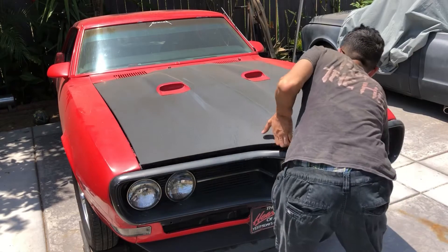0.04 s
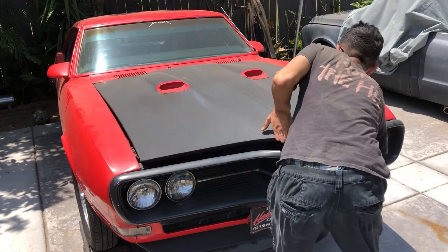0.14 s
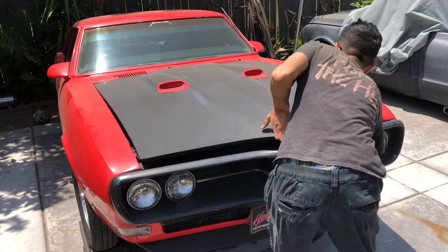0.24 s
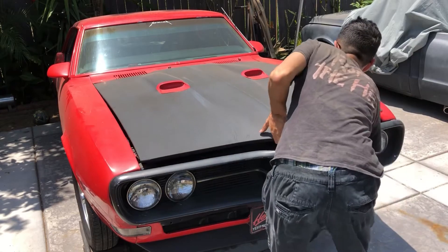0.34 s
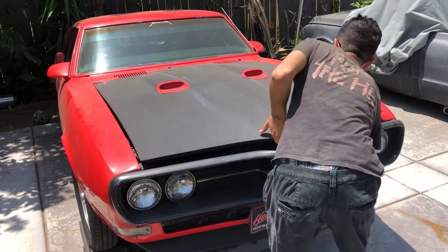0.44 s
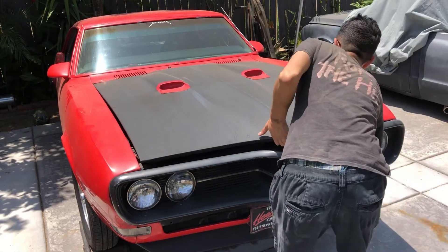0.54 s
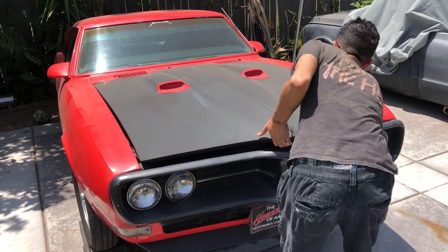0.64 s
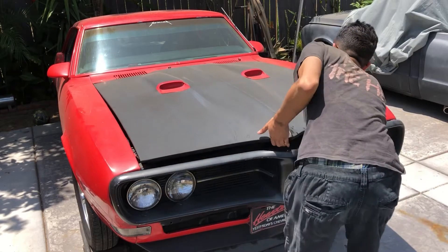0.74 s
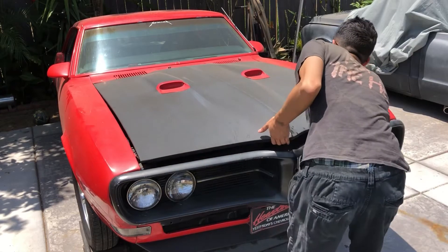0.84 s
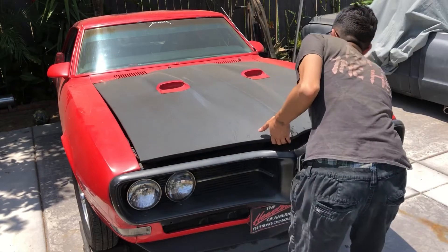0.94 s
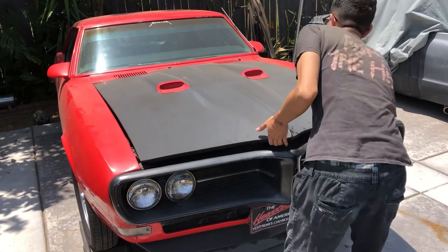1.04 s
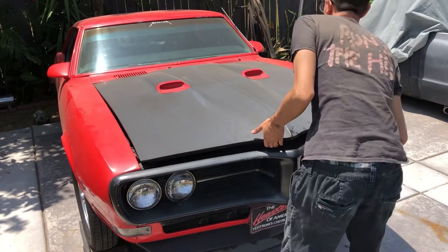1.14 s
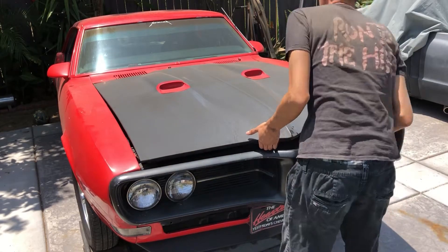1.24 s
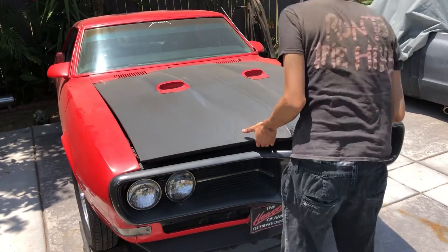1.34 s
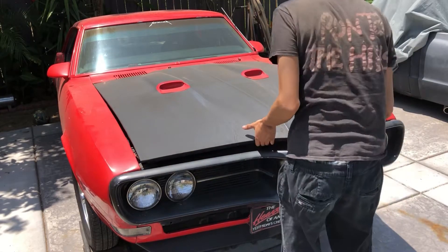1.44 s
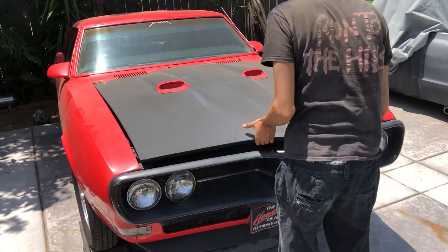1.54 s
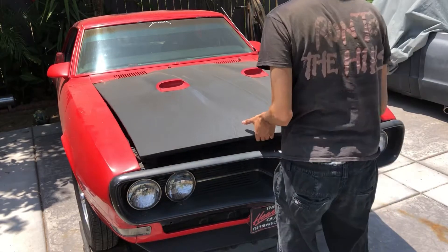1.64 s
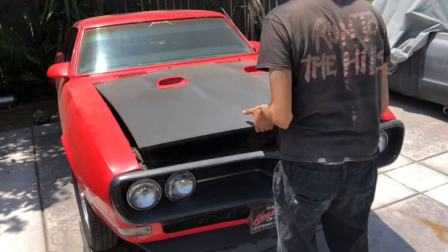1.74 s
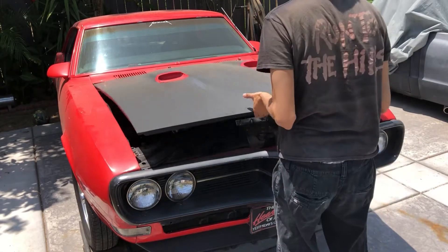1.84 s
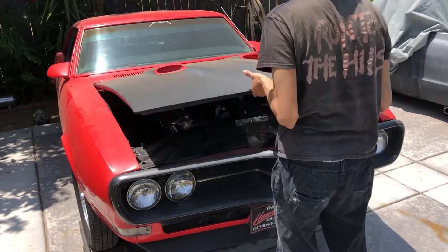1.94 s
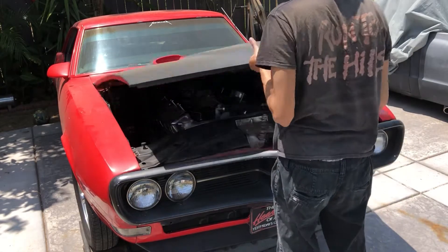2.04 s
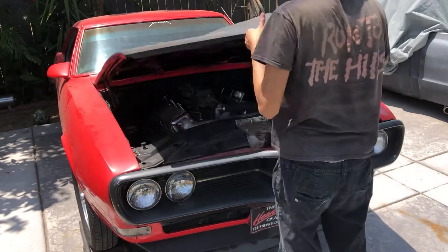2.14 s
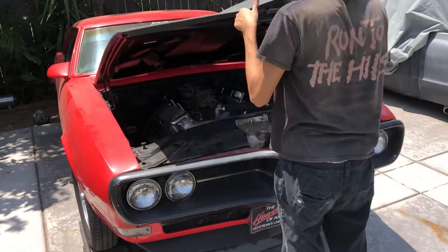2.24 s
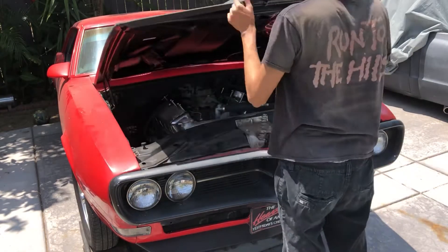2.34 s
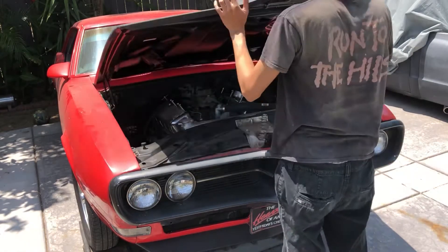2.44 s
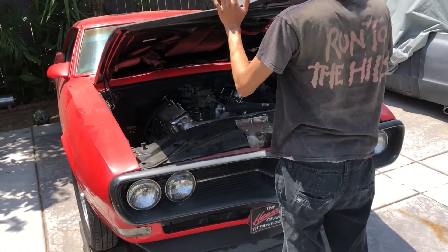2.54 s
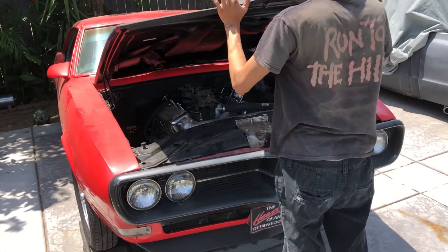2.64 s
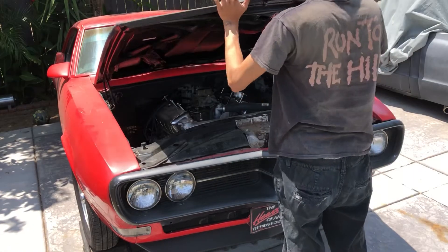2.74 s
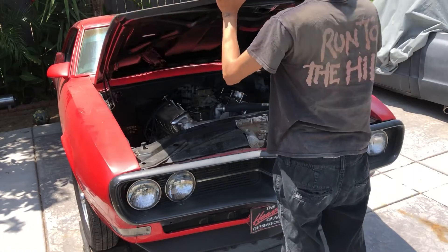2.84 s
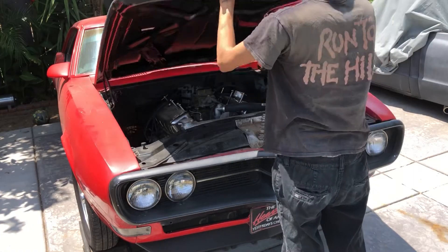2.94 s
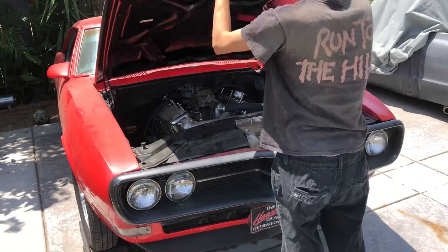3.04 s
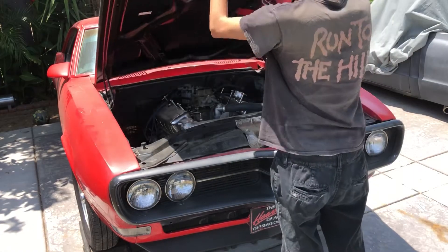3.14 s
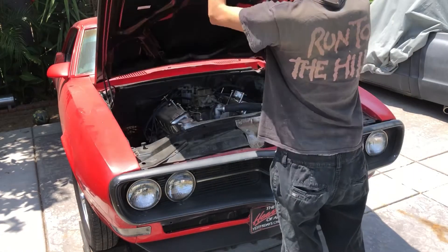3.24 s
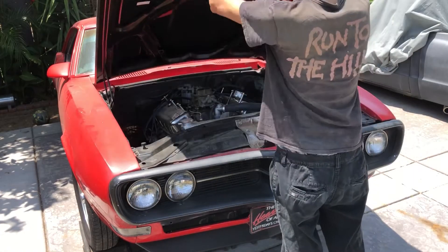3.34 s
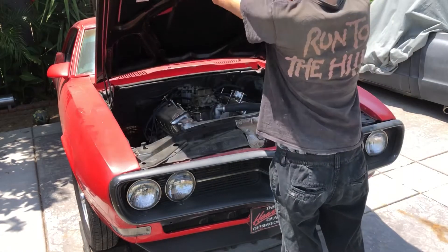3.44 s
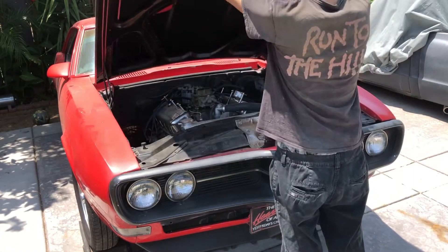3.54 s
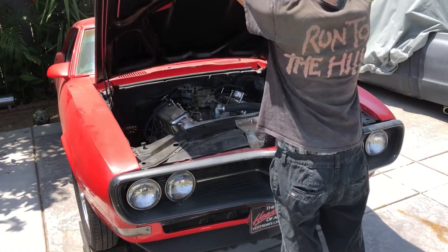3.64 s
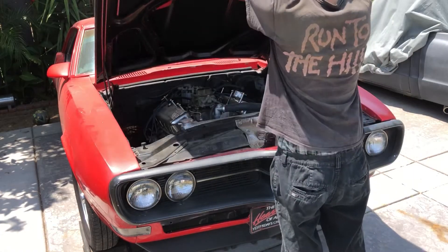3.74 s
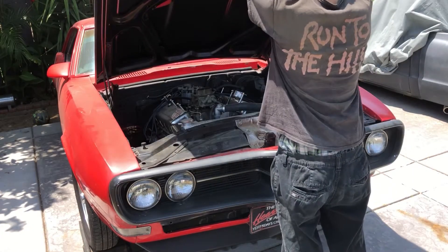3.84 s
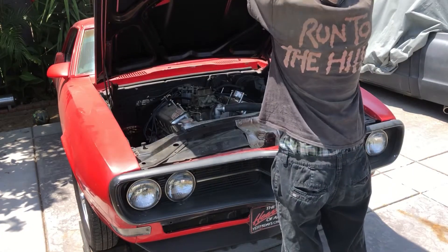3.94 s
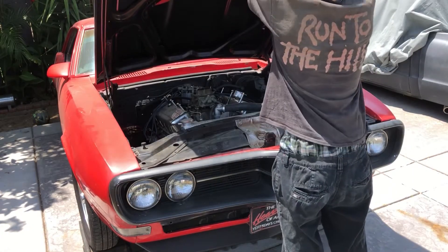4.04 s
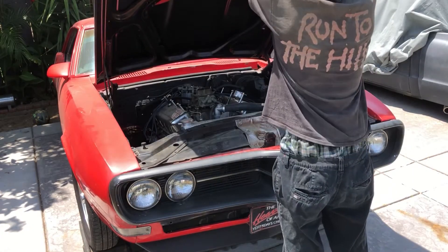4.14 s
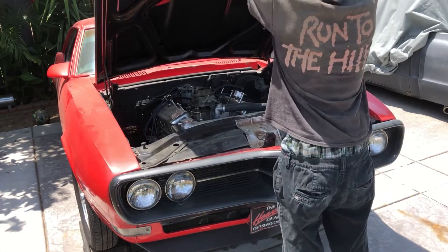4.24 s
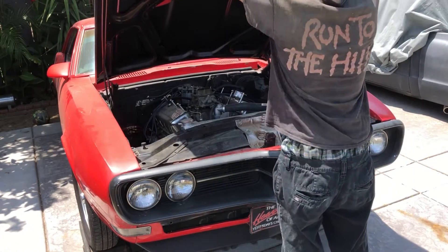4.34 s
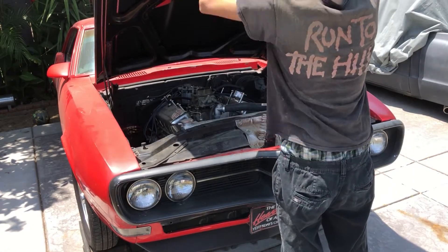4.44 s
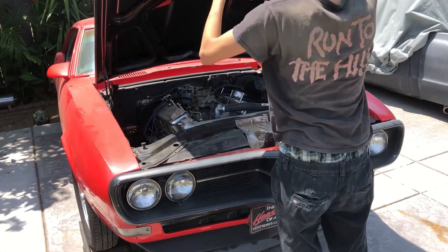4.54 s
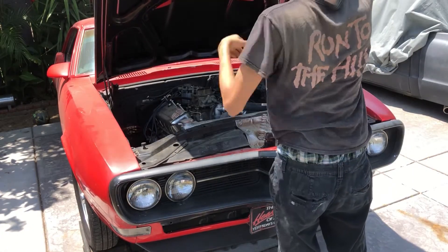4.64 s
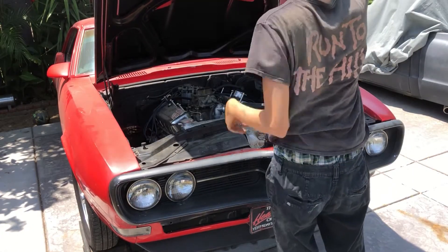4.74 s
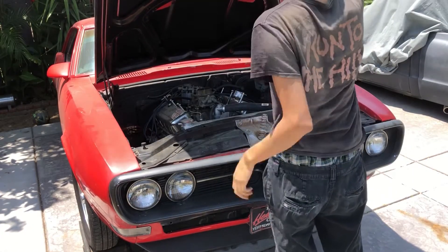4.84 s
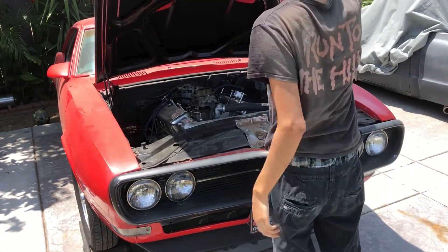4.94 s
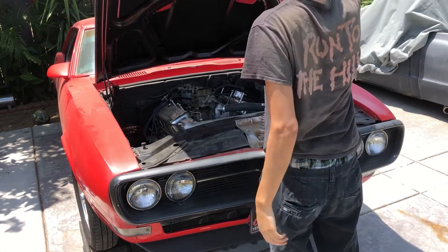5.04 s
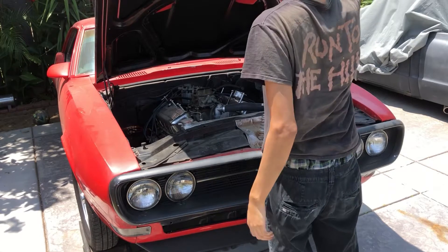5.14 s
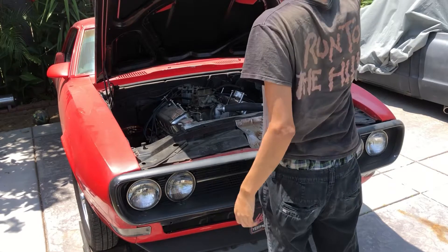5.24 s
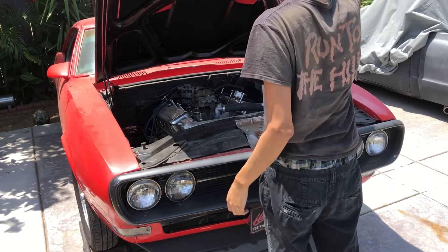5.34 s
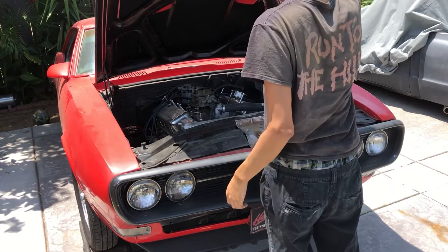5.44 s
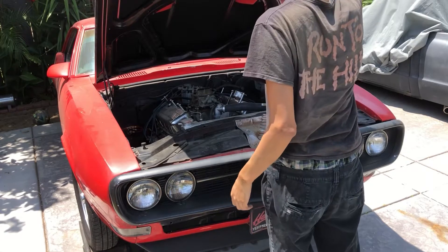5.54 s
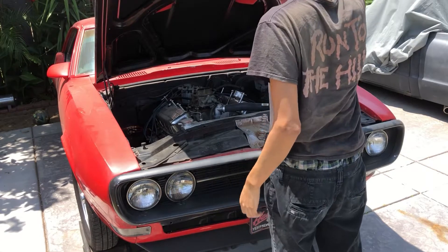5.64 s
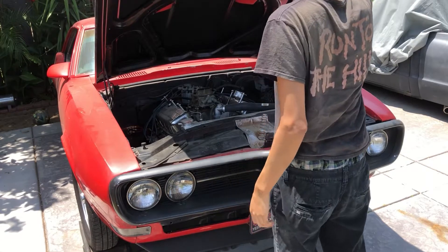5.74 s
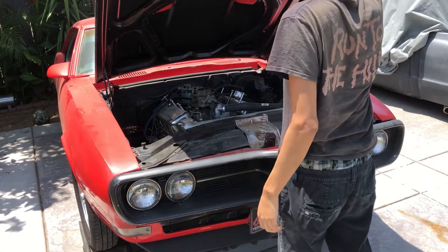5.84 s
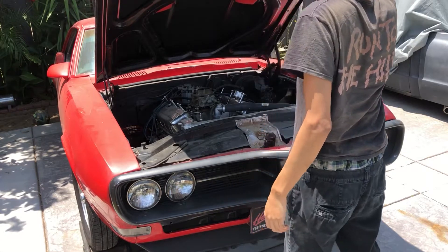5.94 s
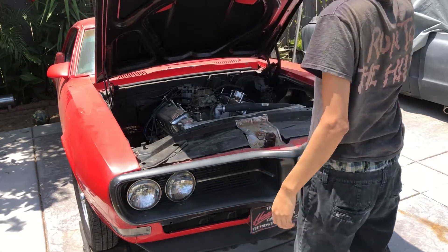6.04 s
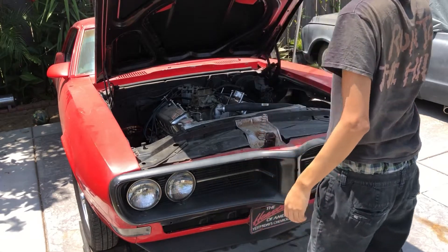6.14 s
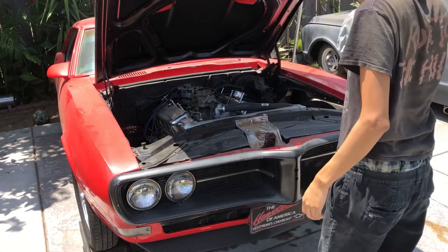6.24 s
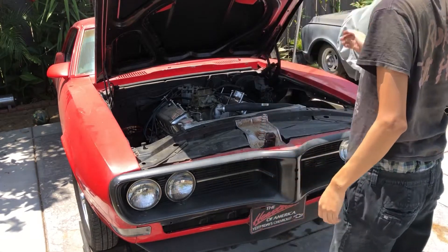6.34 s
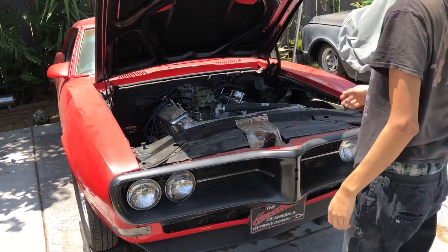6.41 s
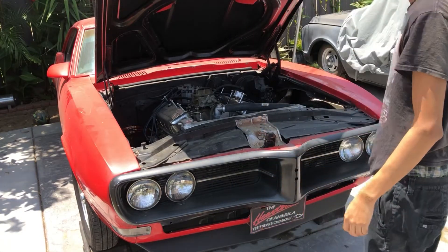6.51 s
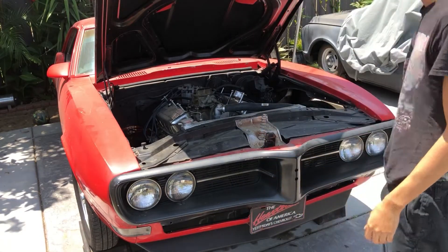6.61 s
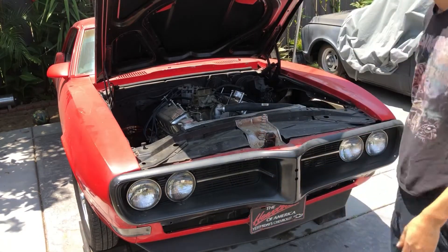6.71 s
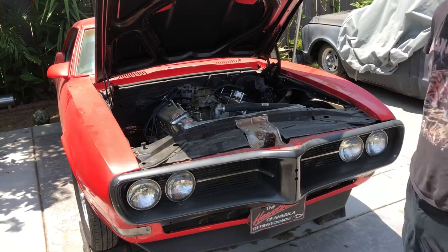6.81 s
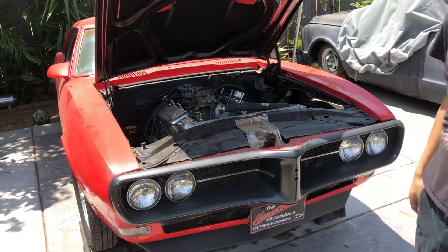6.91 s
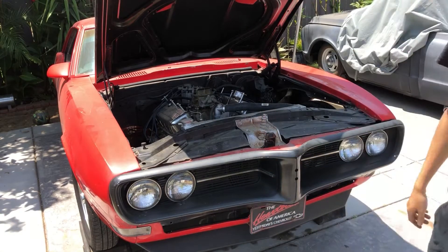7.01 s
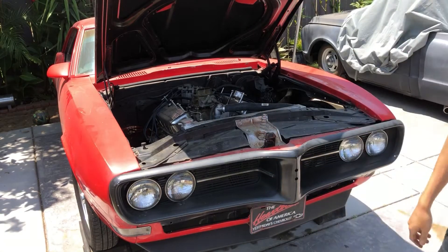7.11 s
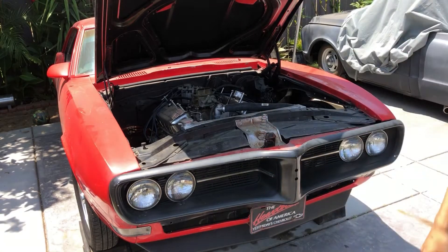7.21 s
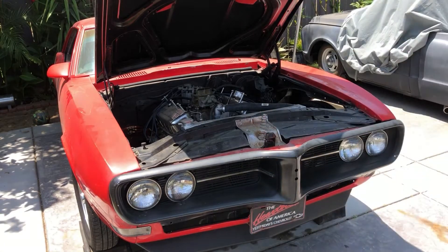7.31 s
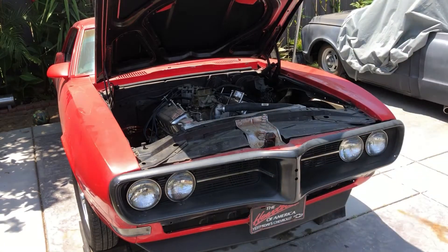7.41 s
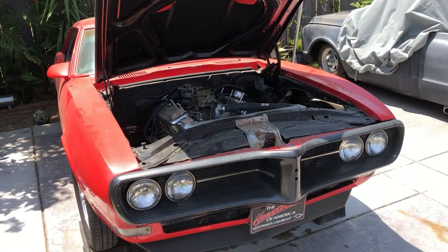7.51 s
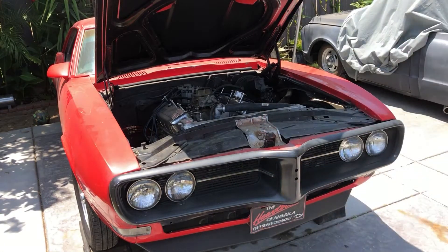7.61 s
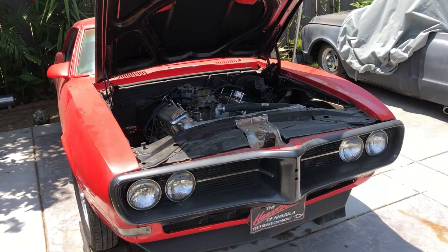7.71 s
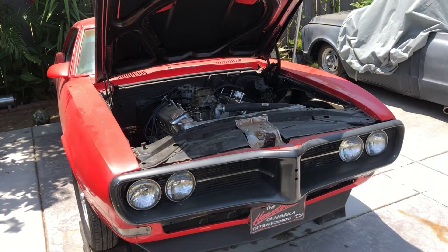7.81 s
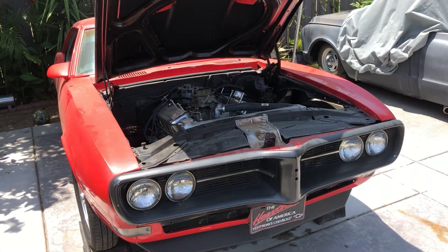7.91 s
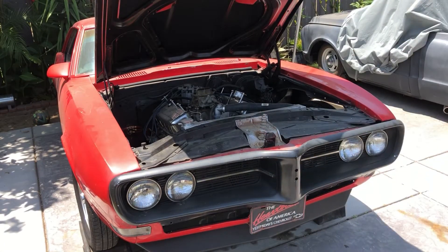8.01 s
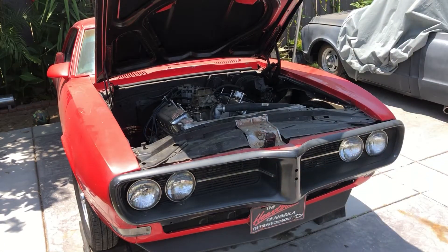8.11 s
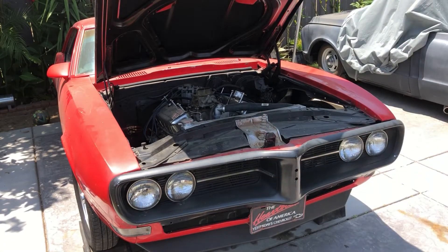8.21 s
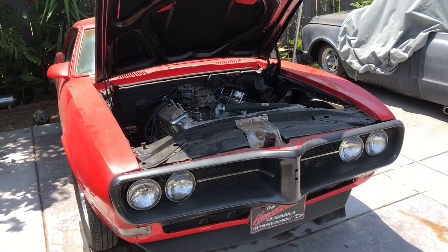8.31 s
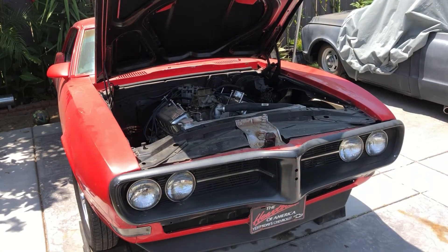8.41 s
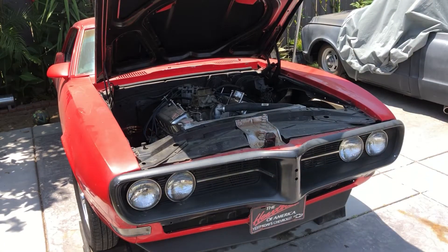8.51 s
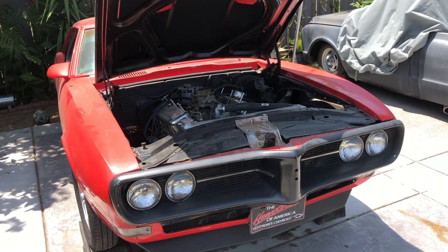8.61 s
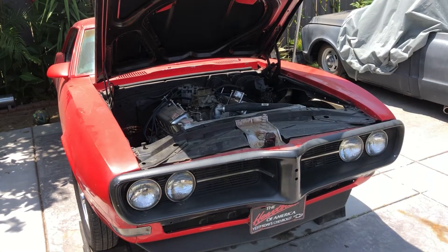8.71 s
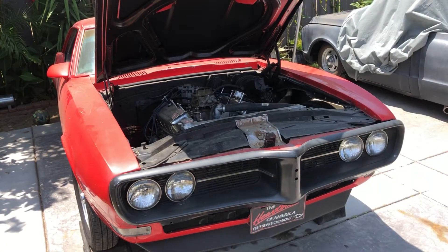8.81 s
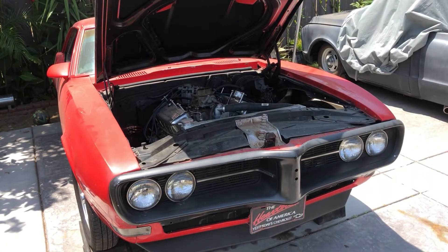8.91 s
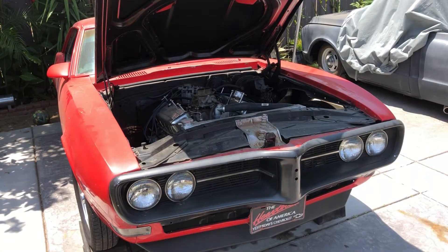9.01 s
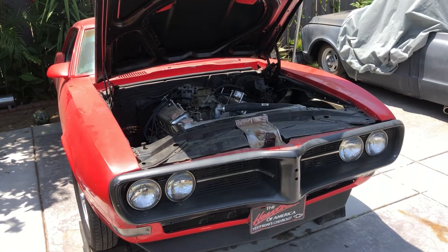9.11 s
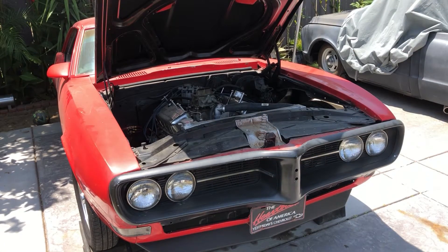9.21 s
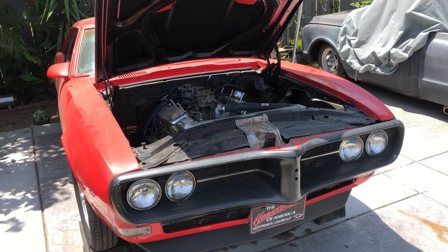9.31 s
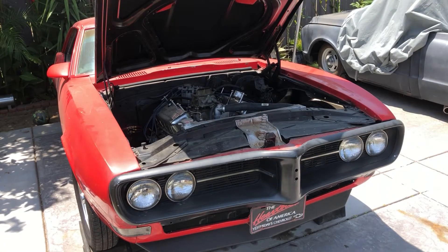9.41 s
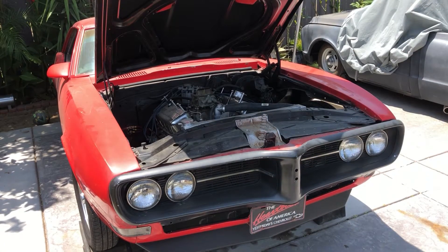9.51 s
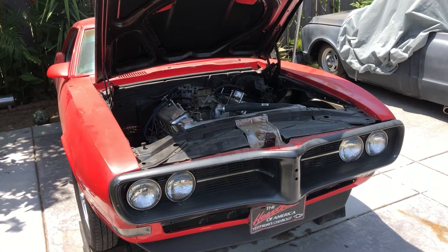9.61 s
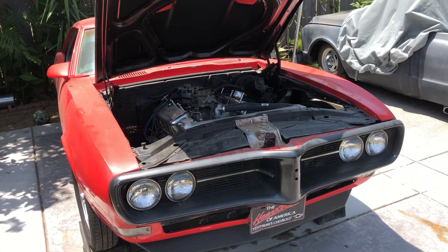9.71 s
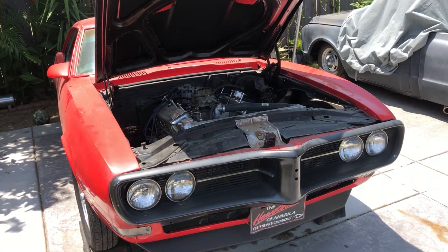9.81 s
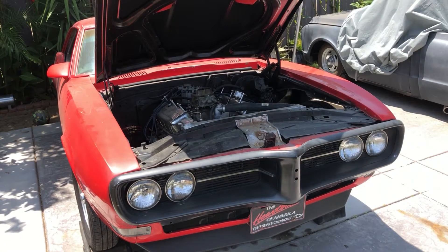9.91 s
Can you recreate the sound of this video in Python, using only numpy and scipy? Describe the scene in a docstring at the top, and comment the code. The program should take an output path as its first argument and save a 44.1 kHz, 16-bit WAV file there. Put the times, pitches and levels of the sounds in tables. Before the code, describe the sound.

Close by, a car's steel hood pops loose with a sharp, ringing clunk and lighter clicks. The catch then scrapes and snaps open, and a spring rattles quickly against the hinge as the hood lifts. The rest is quiet outdoor air: one nearby bird whistles falling notes, others chirp farther off, shoes scuff softly on paving, and a far engine drones under the hush of a town.

```python
"""A car's hood latch lets go with clunks in a paved yard: steel rasps on steel and rings the plate and hood.
The safety catch snaps free and the hood swings up, flexing, while a hinge spring chatters against its arm.
A near bird whistles mostly falling notes, farther birds twitter and chip, shoes scuff the paving,
and a far engine drones over the hush of the town."""
import sys
import numpy as np
from scipy import signal
from scipy.fft import rfft, irfft, next_fast_len
from scipy.io import wavfile
from scipy.ndimage import map_coordinates

SR = 44100
rng = np.random.default_rng(int(sys.argv[2]) if len(sys.argv) > 2 else 0)


def generate_wav(signal):
    """Clip the signal to [-1, 1] and save it as 16-bit WAV at the path in sys.argv[1]."""
    frames = np.transpose(np.atleast_2d(signal))
    scaled = np.clip(frames, -1, 1) * 32767
    pcm = np.round(scaled).astype(np.int16)
    wavfile.write(sys.argv[1], SR, pcm)


N = 439236

# steel-on-steel noise: freq_hz, density_db
RASP_SPECTRUM = [(88, -2), (150, -6.5), (484, -15.5), (589, 2), (888, -19), (1360, -7.5), (2360, -10),
                 (2700, -7.5), (12000, -18.5), (16000, -20)]
# dry grit noise: freq_hz, density_db
GRIT_SPECTRUM = [(710, -5), (1200, -4), (1790, -3.5), (2320, -1.5), (8170, -8), (16000, -19)]


def latch():
    """Each blow rasps steel over steel, rings the plate and booms in the hood."""
    # latch blows: start_s, level_db, boom_rel_db, ring_rel_db, rasp_t60_s, rise_s, dull_db_per_oct
    blows = [(0.035, -30, -15, -38, 0.22, 0.0089, -1), (0.1047, -8.5, -17, -21, 0.16, 0.0052, -4.5),
             (0.328, -41.5, 5, -33, 0.026, 0.00041, -0.5), (.4584, -29, -3.5, -30, 0.062, 0.0037, -1.5),
             (.524, -38.5, -20, -31, 0.068, 0.0033, 5.5), (0.5818, -31.5, -28, -25, 0.12, 0.00051, 6.5),
             (0.873, -49, -18, -35, 0.23, 0.0032, -2.5)]
    # latch plate and hood panel: freq_hz, level_db, t60_s
    plate_modes = [(1730, -9.5, 0.39), (2400, -12, 0.25), (2780, -4, 0.24), (3450, -1.5, 0.13),
                   (4400, -5, 0.26), (4732, 3, 0.072), (4980, -13, 0.35), (6520, -13, 0.053),
                   (7460, -13, 0.11), (8000, -15.5, 0.31), (8791, -15, 0.12)]
    hood_modes = [(319, -17, 1.1), (442, -18, .3), (534, -7.5, 0.49), (587, -4, 0.43), (655, -9, 1),
                  (788, -11, 0.48), (1010, -12.5, .3)]
    rasp, plate, hood = np.zeros((3, N))
    for start_s, db, boom_db, ring_db, t60_s, rise_s, dull in blows:
        add(plate, start_s, amp(db + ring_db) * ring(plate_modes, rise_s=0.0024, detune=0.006))
        add(hood, start_s, amp(db + boom_db - 8.5) * ring(hood_modes, rise_s=0.016, detune=0.0022))
        add(rasp, start_s, amp(db - 5) * burst(t60_s, rise_s, RASP_SPECTRUM, dull, treble_ratio=0.45))
    return rasp + plate * rattle(250) + hood * amp(4 * wobble(30))


def release_lever():
    """The lever snaps back against its stop and rings thinly."""
    # lever: freq_hz, level_db, t60_s
    modes = [(1246, 0, 0.13), (2487, -2, .11), (3280, -6, .13), (3920, -1, 0.17), (4910, -2, .13),
             (6260, -14, 0.14), (7650, -13, .16), (9250, -10, .08)]
    out = np.zeros(N)
    add(out, start_s=0.5815, sound=amp(-49) * ring(modes, rise_s=0.0008, detune=0.0029))
    return out * rattle(120)


def safety_catch():
    """The hook clicks into the catch, then snaps and scrapes free; the contact point decides which modes are
    loudest."""
    # catch snaps: start_s, level_db, emphasis_hz, thunk_rel_db, scrape_t60_s, dull_db_per_oct
    snaps = [(.4442, -30, 3400, -35, 0.089, 1.5), (1.5673, -19, 3440, -4.5, 0.15, -1),
             (1.6182, -20, 2460, -3.5, 0.19, -1), (1.643, -20.5, 2560, -6, 0.13, -1),
             (1.662, -31, 2700, 6, 0.095, 1)]
    # hook and bracket: freq_hz, level_db, t60_s
    hook_modes = [(1590, -17, 0.23), (1810, -14, 0.21), (2350, -6, 0.14), (2540, -5.5, 0.11),
                  (2635, -7, 0.15), (3140, -1.5, 0.077), (3580, 0, 0.078), (4560, -15, 0.11)]
    bracket_modes = [(686, -3.5, .06), (905, -17, .08), (1100, -19, .08)]
    out, hook = np.zeros((2, N))
    for start_s, db, emphasis_hz, thunk_db, t60_s, dull in snaps:
        touched = [(hz, mode_db - 12 * abs(np.log2(hz / emphasis_hz)), mode_t60_s)
                   for hz, mode_db, mode_t60_s in hook_modes]
        add(hook, start_s, amp(db - 14.5) * ring(touched, rise_s=0.0029, detune=0.0138))
        thunk = ring(bracket_modes, rise_s=0.0075, detune=0.022)
        add(out, start_s - 0.011, amp(db + thunk_db) * thunk)  # the bracket gives first
        add(out, start_s, amp(db - 10.5) * burst(t60_s, 0.0024, RASP_SPECTRUM, dull))
    return out + hook * rattle(250)


def hinge_spring():
    """The stretched spring knocks its arm at a near-steady beat; both ring."""
    # spring knocks: start_s, level_db, arm_low_db
    knocks = [(1.706, -45, -55), (1.736, -31, -51.5), (1.8063, -31, -57), (1.874, -37.5, -63),
              (1.9093, -39, -55), (1.9431, -26, -48.5), (2.0133, -26, -43.5), (2.083, -27.5, -43.5),
              (2.14, -37, -58), (2.1535, -29.5, -53), (2.2252, -32, -52.5), (2.298, -31, -53),
              (2.3689, -36, -57)]
    # spring coil, arm treble, arm mids: freq_hz, level_db, t60_s
    coil_modes = [(5820, -28, .1), (6950, -4.5, 0.088), (7550, -6, 0.097), (8100, -1.5, 0.079),
                  (8900, -9, 0.086), (10900, -12, 0.11), (11700, -11, .08), (13100, -1, .07),
                  (13800, -10, 0.06), (14600, -11, .07), (15100, -4, 0.06)]
    arm_high_modes = [(2760, -4, 0.14), (3080, 3, 0.062), (3850, -2, 0.16), (4060, 4, 0.097),
                      (5440, -5, 0.27), (6270, -12, 0.25)]
    arm_low_modes = [(1000, -4, 0.22), (1277, -1, 0.14), (1430, -4, .07), (1570, -8, 0.55),
                     (1710, -15, 0.22)]
    # impact noise: freq_hz, density_db
    crack = [(410, -14.5), (700, -5), (1260, -8.5), (2050, -13.5), (5120, -11), (8100, -9.5),
             (11200, -15.5), (13500, -12), (16000, -19)]
    out, coil, arm = np.zeros((3, N))
    for start_s, db, arm_low_db in knocks:
        arm_high_db = -52 + 0.5 * (db + 29)
        add(out, start_s, amp(arm_low_db) * ring(arm_low_modes, rise_s=0.0017, detune=0.0059))
        add(coil, start_s, amp(db - 12) * ring(coil_modes, rise_s=0.00043, detune=0.024, scatter_db=3.5))
        add(arm, start_s, amp(arm_high_db) * ring(arm_high_modes, rise_s=0.0029, detune=0.0032))
        add(out, start_s, amp(db - 13) * burst(0.17, 0.00062, crack))
        add(out, start_s, amp(db - 12.5) * burst(0.0082, 0.0001, crack))
    return out + coil * rattle(600) + arm * rattle(90)


def hinge_pivot():
    """The pivot rubs as the hood swings."""
    # rubbing: time_s, level_db
    swing = [(1.66, -54.5), (2.034, -49), (2.6, -67)]
    spectrum = [(500, 0), (900, 2), (3000, -4), (8000, -10), (16000, -28)]  # freq_hz, density_db
    return envelope(swing, fade_s=0.025) * amp(3 * wobble(150)) * noise(spectrum)


def hood_panel():
    """The flexing hood rumbles in lumps and thumps on its stops."""
    # one curve per flex: time_s, level_db
    flexes = [
        [(0, -38.5), (.1, -40), (.16, -40), (.3, -49), (.45, -51.5), (.66, -47), (.78, -77), (.88, -49),
         (1.0, -65)],
        [(4.15, -51), (4.24, -54), (4.29, -74)],
    ]
    # sheet steel rumble: freq_hz, density_db
    spectrum = [(76, -32), (130, 1.5), (167, -10.5), (292, -5.5), (450, -0.5), (536, -1.5), (851, -11),
                (1300, -19), (1690, -19), (2860, -120)]
    # hood on its stops: start_s, pitch_hz, level_db, t60_s
    thumps = [(.044, 280, -13, 0.021), (.046, 518, -24, 0.043), (0.105, 270, -42, 0.065),
              (.132, 598, -23, 0.14), (.872, 442, -51, 0.064), (4.162, 440, -45, .06),
              (4.213, 510, -41.5, 0.1), (4.23, 378, -42, 0.094), (4.274, 161, -31.5, 0.028)]
    level = sum(envelope(flex, fade_s=0.014) for flex in flexes)
    out = level * amp(2.1 * wobble(50)) * noise(spectrum)
    t = np.arange(SR // 2) / SR
    attack = 1 - np.exp(-t / 0.002)
    for start_s, hz, db, t60_s in thumps:
        add(out, start_s, amp(db - 60 * t / t60_s) * attack * np.sin(2 * np.pi * hz * t))
    return out


def ticks():
    """Small dry ticks: a sharp click with a duller tail."""
    # ticks: start_s, level_db, dull_db_per_oct
    hits = [(.536, -48, 9), (1.17, -49, 3), (1.263, -46, 0), (2.7631, -49, 0.1), (3.012, -48, 2),
            (4.2073, -49, -14), (4.7747, -36, -3), (4.811, -42, -3), (4.834, -39.5, -1.5),
            (5.6125, -51, -9), (5.9296, -54, 0.1), (6.12, -48, 1), (6.859, -46.5, -2), (6.93, -50, 1),
            (7.752, -40.5, 1), (7.853, -57, 3), (8.2691, -44, -3)]
    out = np.zeros(N)
    for start_s, db, dull in hits:
        add(out, start_s, amp(db - 12) * burst(0.12, 0.00028, GRIT_SPECTRUM, dull))
        add(out, start_s, amp(db + 4.5) * burst(0.0023, 0.0001, GRIT_SPECTRUM, dull - 2))
    return out


def shoe_scuffs():
    """Soles drag on paving: gritty noise swells and fades."""
    # drags: peak_s, level_db, before_s, after_s
    drags = [(1.418, -61.5, .05, .05), (3.028, -60, 0.47, 0.3), (4.772, -61, .012, .2),
             (7.018, -62, 0.37, .07), (7.748, -57, 0.14, 0.06), (8.29, -60.5, 0.09, 0.94)]
    level = np.zeros(N)
    for peak_s, db, before_s, after_s in drags:
        edge_db = db - 24.5
        swell = [(peak_s - before_s, edge_db), (peak_s, db), (peak_s + after_s, edge_db)]
        level += envelope(swell, fade_s=0.01)
    return level * amp(2.2 * wobble(300)) * noise(GRIT_SPECTRUM)


def bird_whistles():
    """Near-pure notes: the pitch glides fast, then drifts; the level swells, fades and flutters."""
    # notes: start_s, length_s, start_hz, settled_hz, end_hz, glide_s, swell_s, level_db
    notes = [(1.239, .105, 4970, 4170, 4140, 0.044, 0.089, -50),
             (1.368, 0.22, 4580, 3960, 3680, 0.043, 0.011, -51),
             (3.467, 0.17, 4110, 3840, 3790, 0.072, .15, -60.5),
             (3.846, 0.17, 4990, 4110, 4370, 0.036, 0.025, -43),
             (3.958, 0.29, 4890, 3960, 3710, 0.028, 0.0084, -50.5),
             (4.922, 0.15, 5040, 4400, 4370, 0.037, 0.054, -57),
             (5.048, 0.55, 4420, 4080, 3980, 0.042, 0.069, -52.5),
             (6.438, 0.044, 4190, 4420, 4400, 0.021, .021, -53.5),
             (6.625, 0.3, 4010, 3870, 3724, 0.047, 0.13, -50),
             (6.907, 0.32, 4660, 4370, 4266, 0.049, 0.06, -45),
             (8.06, 0.114, 5100, 4290, 4180, 0.042, 0.12, -46),
             (8.195, 0.23, 4565, 4115, 3996, 0.034, 0.052, -48.5),
             (8.415, 0.085, 3975, 4010, 3973, 0.034, 0.055, -53),
             (9.665, 0.078, 4090, 4260, 4180, 0.015, 0.075, -52.5),
             (9.709, 0.17, 4320, 3250, 3170, 0.022, 0.0058, -50.5)]
    swell_db, fade_db_per_s, edge_s = 6, 73, 0.0059
    out = np.zeros(N)
    waver_hz = 12 * wobble(120)
    for start_s, length_s, start_hz, settled_hz, end_hz, glide_s, swell_s, level_db in notes:
        t = np.arange(round(length_s * SR)) / SR
        glide_hz = (start_hz - settled_hz) * np.exp(-t / glide_s)
        drift_hz = (end_hz - settled_hz) * t / length_s
        phase = phase_of(settled_hz + glide_hz + drift_hz + span(waver_hz, start_s, len(t)))
        db = level_db - swell_db * (1 - t / swell_s).clip(0) - fade_db_per_s * (t - swell_s).clip(0)
        edges = np.clip(np.minimum(t, length_s - t) / edge_s, 0, 1)
        add(out, start_s, amp(db) * edges * (np.sin(phase) + amp(-38) * np.sin(3 * phase)))
    return out * amp(2.2 * wobble(30) + 1.2 * wobble(180))


def bird_twitter():
    """Far raspy warbles: a fast uneven trill, sagging in pitch, chopped into syllables."""
    # calls: start_s, length_s, pitch_hz, warble_scale_hz, level_db
    calls = [(0.76, 0.26, 4100, 515, -67), (1.05, 0.093, 4540, 303, -57.5), (1.171, 0.027, 4400, 300, -57),
             (1.474, 0.085, 4700, 345, -55.5), (2.553, 0.079, 4700, 507, -65),
             (3.308, 0.058, 5620, 100, -62), (3.347, 0.065, 4780, 380, -56.5), (3.5, 0.06, 4200, 300, -61),
             (3.418, 0.1, 4720, 251, -58.5), (3.994, 0.087, 4600, 200, -61), (6.475, .04, 5060, 400, -62),
             (6.541, 0.056, 5380, 500, -57), (6.73, 0.1, 5640, 150, -66), (7.077, 0.088, 3780, 250, -61),
             (7.423, 0.063, 4690, 404, -55.5), (7.459, 0.14, 3750, 298, -62.5),
             (7.637, 0.038, 5400, 300, -62), (8.848, 0.06, 4950, 352, -58.5), (8.915, .035, 4350, 250, -57),
             (9.49, 0.06, 5900, 250, -61), (9.526, 0.12, 4970, 300, -50)]
    out = np.zeros(N)
    warble = 0.806 * np.tanh(wobble(90)) + 0.42 * wobble(600)
    chop = amp(6.3 * np.tanh(0.64 * wobble(60)) + 0.87 * wobble(320))
    for start_s, length_s, pitch_hz, scale_hz, db in calls:
        n = round(length_s * SR)
        progress = np.linspace(0, 1, n)
        sag = 0.904 * (progress - 0.5)
        phase = phase_of(pitch_hz + scale_hz * (span(warble, start_s, n) - sag))
        level = unit(span(chop, start_s, n)) * np.sin(np.pi * progress).clip(0) ** 0.11
        overtones = amp(-28) * (np.sin(2 * phase) + np.sin(3 * phase))
        add(out, start_s, amp(db) * level * (np.sin(phase) + overtones))
    return out


def bird_chips():
    """Quick rising chips of a far bird."""
    # chips: start_s, level_db
    chips = [(3.33, -59), (3.395, -56), (3.46, -54), (3.565, -62), (8.212, -55), (8.897, -57), (8.94, -59),
             (8.965, -53)]
    length_s, pitch_hz, rise_hz = 0.017, 3550, 300
    out = np.zeros(N)
    progress = np.linspace(0, 1, round(length_s * SR))
    for start_s, db in chips:
        phase = phase_of(pitch_hz * rng.normal(1, 0.02) + rise_hz * progress)
        add(out, start_s, amp(db) * np.sin(np.pi * progress) * np.sin(phase))
    return out


def far_vehicle():
    """Firing note of a slowing engine, with tyre noise."""
    # engine note: time_s, pitch_hz, level_db
    firing = [(.05, 89, -50.5), (.5, 81.5, -47.5), (.75, 78, -56), (1.65, 77.4, -46.5), (2.45, 76, -52.5),
              (2.62, 71.8, -44), (2.85, 72, -46.5), (3.14, 72, -36), (3.45, 72, -52.5), (3.8, 71, -57.5),
              (4.0, 70.8, -43), (4.5, 70.6, -52), (5.2, 68, -64.5), (6.6, 64, -58), (7.0, 61, -54),
              (7.4, 58, -66), (8.1, 53, -48), (8.5, 47, -60)]
    # tyre level: time_s, level_db
    passing = [(0, -73), (1.5, -61.5), (3.1, -61), (4.6, -64.5), (5.2, -73), (9.96, -70.5)]
    # tyre noise: freq_hz, density_db
    tyre_spectrum = [(600, -26), (900, 1), (1300, -3), (1800, -9.5), (3000, -37)]
    hz, db = curves(firing)
    drone = np.sqrt(2) * amp(db) * gate(firing, fade_s=0.08) * np.sin(phase_of(hz))
    return drone + amp(curves(passing)[0]) * noise(tyre_spectrum)


def town():
    """Low rumble, far traffic and hiss."""
    # town hush: time_s, traffic_db, hiss_db
    levels = [(0, -66, -54.5), (.7, -50.5, -64.5), (1.3, -52.5, -63), (2.5, -53, -64), (3.1, -53, -62.5),
              (6.3, -50.5, -60.5), (7.8, -50.5, -62), (8.6, -52.5, -63.5), (9.96, -52.5, -62)]
    # its three noise beds: freq_hz, density_db
    rumble_spectrum = [(12, -62), (20, -25), (35, -27), (54, 2), (70, 0.5), (92, -1), (150, -4.5),
                       (200, -35), (330, -120)]
    traffic_spectrum = [(76, 0.5), (130, -2), (187, -1.5), (286, -3), (521, -6), (736, -9.5), (928, -12),
                        (1300, -27.5), (1690, -70), (2860, -120)]
    hiss_spectrum = [(650, -5.5), (1100, 1), (1400, 1.5), (2000, 1), (3000, 1.5), (4700, 1), (8000, -8),
                     (13000, -17.5), (22000, -16)]
    traffic_db, hiss_db = curves(levels)
    rumble = amp(-53.5 + 0.56 * wobble(2.7)) * noise(rumble_spectrum)
    traffic = amp(traffic_db + 0.62 * wobble(5)) * noise(traffic_spectrum)
    return rumble + traffic + amp(hiss_db) * noise(hiss_spectrum)


def ring(modes, rise_s, detune, scatter_db=1.5):
    """Struck modes at random strengths; each beats with a weaker neighbour."""
    t = np.arange(round(SR * max(t60_s for *_, t60_s in modes))) / SR
    neighbours = [(hz, db - 5, t60_s) for hz, db, t60_s in modes]
    tones = np.zeros(len(t))
    for hz, db, t60_s in modes + neighbours:
        decay = amp(db + rng.normal(0, scatter_db) - 60 * t / t60_s)
        tones += decay * np.sin(2 * np.pi * (hz * rng.normal(1, detune) * t + rng.random()))
    return np.sqrt(1.5) * tones * (1 - np.exp(-t / rise_s))


def burst(t60_s, rise_s, spectrum, dull_db_per_oct=0, treble_ratio=1):
    """Decaying noise puff, tilted above 2 kHz; treble_ratio scales the t60 above the crossover."""
    crossover_hz = 8900
    t = np.arange(SR // 2) / SR
    tilt_db = lambda hz: dull_db_per_oct * np.log2(np.clip(hz, 2000, None) / 4000)
    puff = unit(filtered(rng.standard_normal(len(t)), lambda hz: amp(along(spectrum, hz) - tilt_db(hz))))
    treble = filtered(puff, lambda hz: highpass_gain(hz, crossover_hz))
    decay_db = -60 * t / t60_s
    decaying = (puff - treble) * amp(decay_db) + treble * amp(decay_db / treble_ratio)
    return decaying * (1 - np.exp(-t / rise_s))


def rattle(rate_hz, steady=0.6):
    """Gain of a loose part: its ring breaks up at random."""
    return unit(np.tanh(steady + wobble(rate_hz)))


def echoes(x, decays):
    """Scattered reflections, dying away by (freq_hz, t60_s) points."""
    hz, t, bins = signal.stft(rng.standard_normal(SR // 2), SR, nperseg=256)
    tail = signal.istft(bins * amp(-60 * t / along(decays, hz)[:, None]), SR, nperseg=256)[1]
    return signal.fftconvolve(np.pad(x, (300, 0)), tail / np.linalg.norm(tail))[:N]


def noise(spectrum):
    """Coloured noise, rms 1."""
    return unit(filtered(rng.standard_normal(N), lambda hz: amp(along(spectrum, hz))))


def wobble(rate_hz):
    """Smooth random curve, rate_hz knots a second."""
    knots = rng.standard_normal(int(N * rate_hz / SR) + 4)
    return map_coordinates(knots, [np.arange(N) * rate_hz / SR])


def filtered(x, response):
    """FFT filter with gain response(hz)."""
    size = next_fast_len(len(x) + SR // 4)
    return irfft(rfft(x, size) * response(np.fft.rfftfreq(size, 1 / SR)), size)[:len(x)]


def highpass_gain(hz, corner_hz):
    return hz ** 4 / (hz ** 4 + corner_hz ** 4)


def along(points, hz):
    """Interpolate (freq_hz, value) points on a log axis."""
    freqs_hz, values = np.transpose(points)
    return np.interp(np.log(hz + 1), np.log(freqs_hz + 1), values)


def curves(rows):
    """Per-sample curve of each column after time_s."""
    times_s, *columns = np.transpose(rows)
    return [np.interp(np.arange(N) / SR, times_s, column) for column in columns]


def gate(rows, fade_s):
    """1 over a table's time span, fading outside it."""
    t = np.arange(N) / SR
    return np.clip(np.minimum(t - rows[0][0], rows[-1][0] - t) / fade_s + 1, 0, 1) ** 2


def envelope(rows, fade_s):
    """Gated gain from (time_s, level_db) points."""
    return amp(curves(rows)[0]) * gate(rows, fade_s)


def amp(db):
    return 10 ** (np.asarray(db) / 20)


def unit(x):
    return x / np.sqrt(np.mean(x ** 2) + 1e-20)


def phase_of(hz):
    return 2 * np.pi * np.cumsum(hz) / SR


def span(x, start_s, n):
    return x[round(start_s * SR):][:n]


def add(out, start_s, sound):
    out[round(start_s * SR):][:len(sound)] += sound


def scene():
    """Car and shoes echo in the yard, birds in the trees, over the town. Mono."""
    # yard reverberation: freq_hz, t60_s
    yard_decays = [(200, 0.46), (2000, 0.21), (10000, 0.051)]
    car = latch() + release_lever() + safety_catch() + hinge_spring() + hinge_pivot() + hood_panel()
    foreground = car + ticks() + shoe_scuffs()
    near_bird = bird_whistles()
    far_birds = bird_twitter() + bird_chips()
    trees = echoes(amp(-1) * near_bird + amp(-1.5) * far_birds, [(4000, 0.37)])
    yard = amp(-8) * echoes(foreground, yard_decays)
    return (foreground + yard + near_bird + far_birds + trees + far_vehicle() + town())[None]


def record(dry):
    """Deep bass rolls off; the treble ends at a steep band limit."""
    low_hz, top_hz, edge_hz = 37.3, 15750, 200
    band_limit = lambda hz: np.clip((top_hz - hz) / edge_hz + 0.5, 0, 1)
    return filtered(dry[0], lambda hz: band_limit(hz) * highpass_gain(hz, low_hz))[None]


dry = scene()
out = record(dry)
generate_wav(out)
```